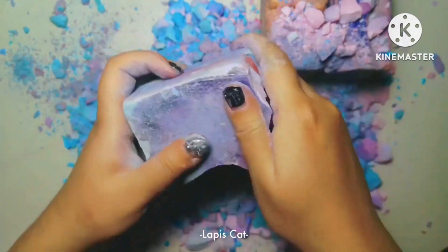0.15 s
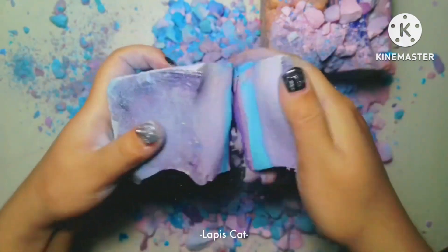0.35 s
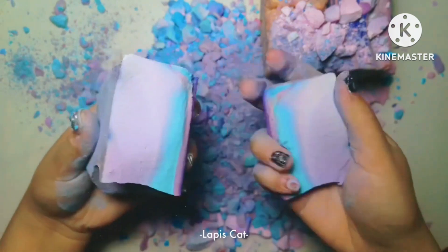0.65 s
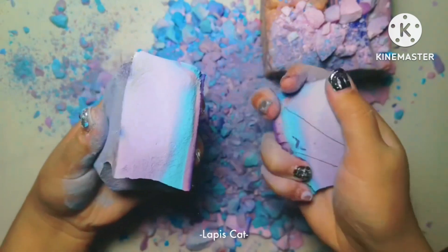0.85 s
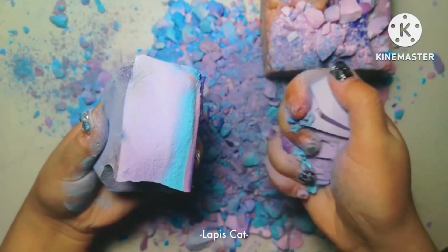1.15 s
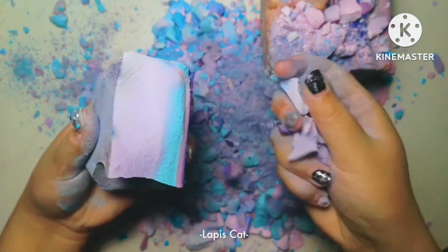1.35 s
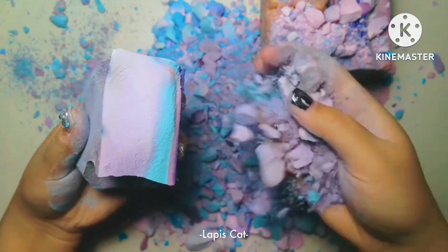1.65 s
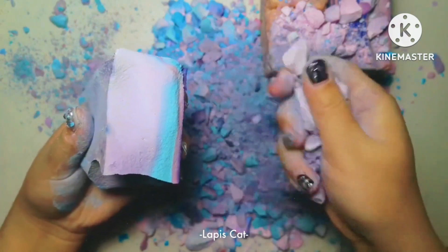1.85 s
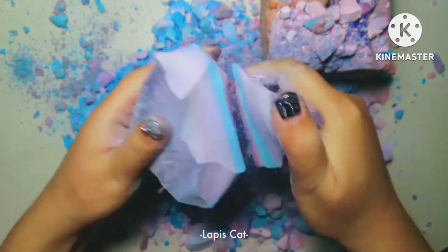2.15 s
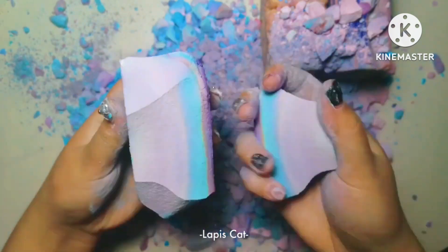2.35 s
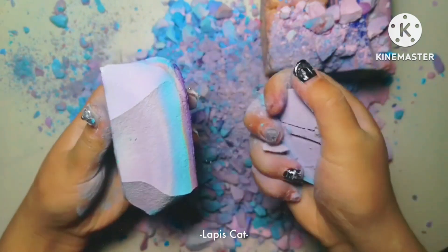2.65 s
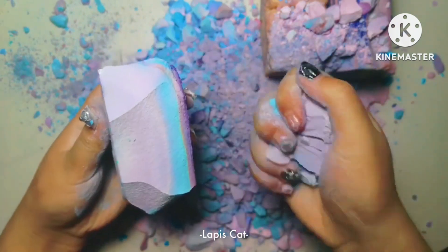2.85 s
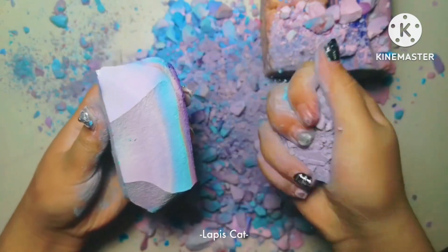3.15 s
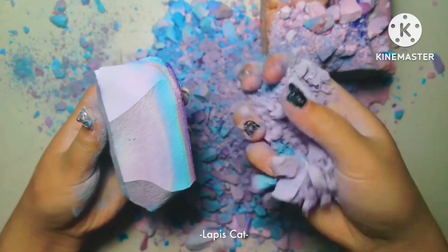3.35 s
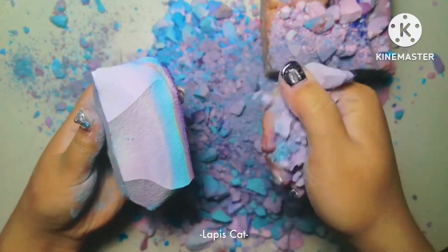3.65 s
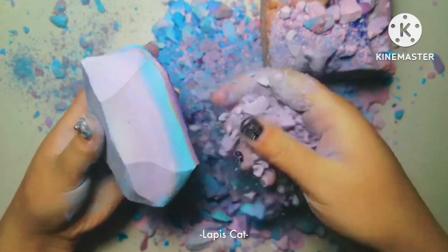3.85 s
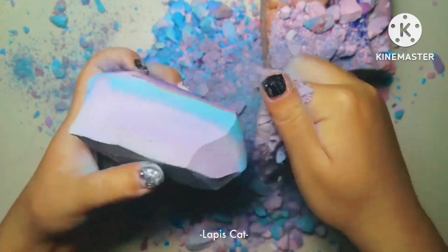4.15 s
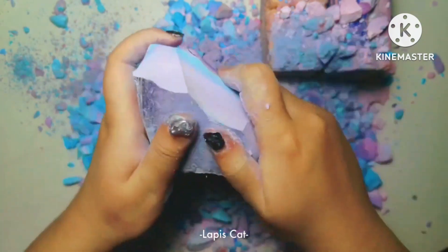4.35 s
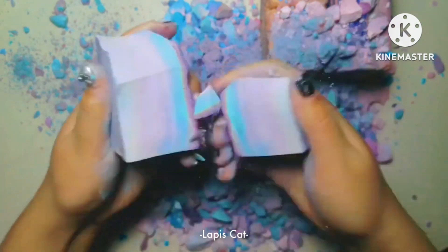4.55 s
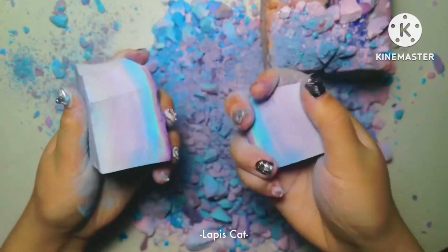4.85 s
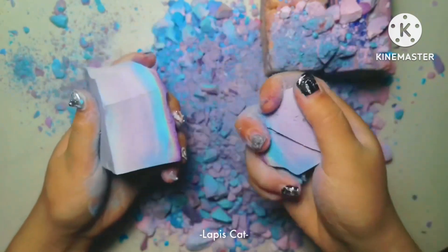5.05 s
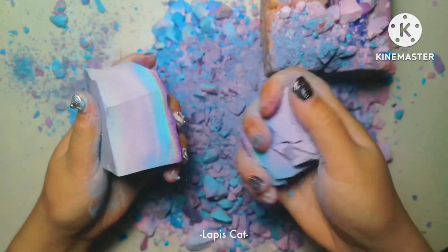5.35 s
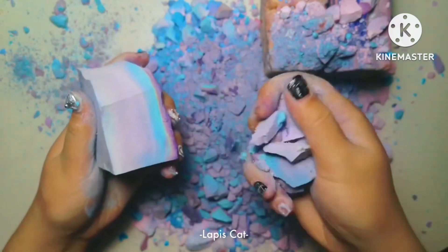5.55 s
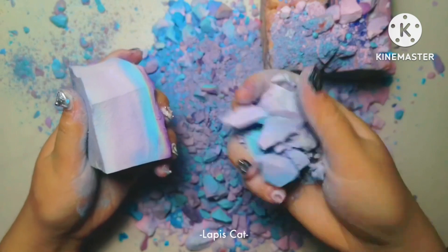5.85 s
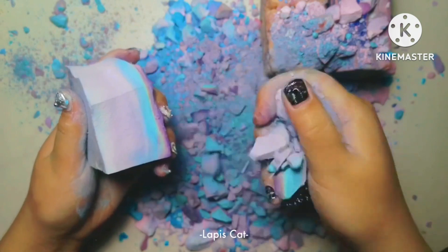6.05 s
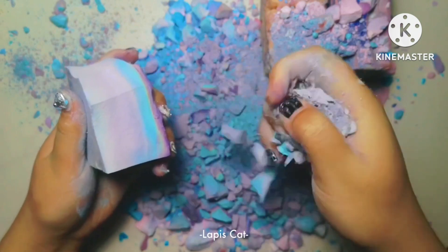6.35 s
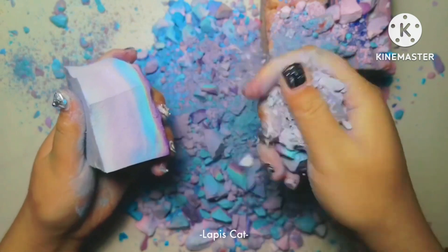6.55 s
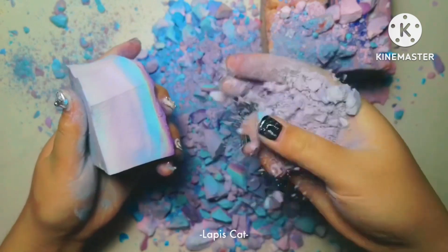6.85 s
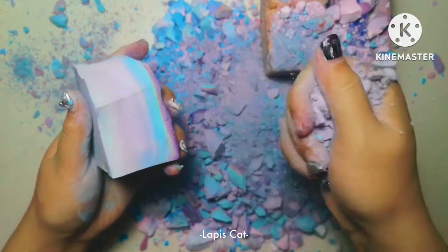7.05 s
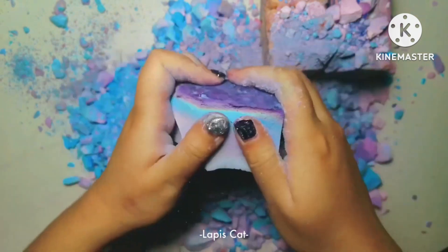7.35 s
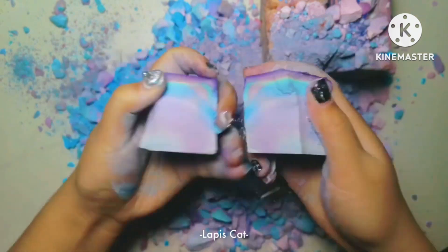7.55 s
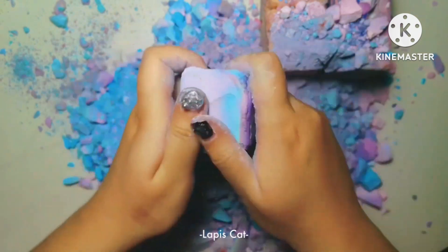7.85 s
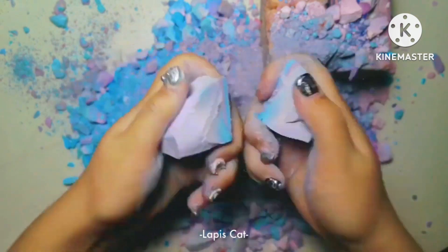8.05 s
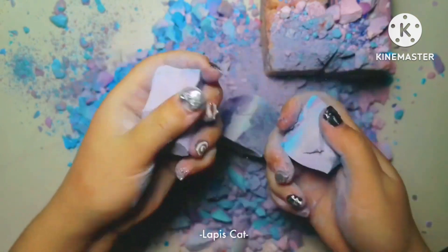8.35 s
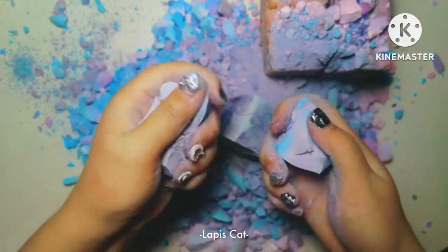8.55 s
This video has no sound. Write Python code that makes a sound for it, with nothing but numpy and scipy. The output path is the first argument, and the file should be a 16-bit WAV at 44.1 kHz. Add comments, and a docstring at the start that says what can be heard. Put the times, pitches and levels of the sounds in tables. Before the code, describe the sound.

Hands snap and crush soft chalk up close, with sharp cracks, dense crumbling, powdery hiss and low thumps in a quiet room.

```python
"""A quiet room, where two hands snap and crush blocks of soft chalk right at a pair of microphones.
Cracks are short bursts of noise with a brief ring, over a bed of crumbling grains. Powder hisses
under the skin, sliding chalk faces squeak, and loose pieces knock together. The grip and the breaks
shake the microphones, and the biggest jolts overload the recorder."""
import sys
import numpy as np
from scipy import signal
from scipy.fft import rfft, irfft, next_fast_len
from scipy.io import wavfile

SR = 44100
rng = np.random.default_rng(int(sys.argv[2]) if len(sys.argv) > 2 else 0)


def to_wav(sig):
    """Store sig (one row per channel, or 1-D mono) as 16-bit WAV at the path in sys.argv[1].

    Samples outside -1..1 are clipped; the rate is SR.
    """
    pcm = np.clip(np.atleast_2d(sig), -1, 1) * 32767
    pcm = np.round(pcm).astype(np.int16)
    wavfile.write(sys.argv[1], SR, pcm.T)  # frames by channels


N = 383229


def from_db(db):
    return 10 ** (np.asarray(db) / 20)


def at_hz(points, hz):
    points_hz, values = np.transpose(points)
    return np.interp(np.log(hz), np.log(points_hz), values)


def pan_gains(pan_db):
    """Left and right gains; positive leans left."""
    return from_db([[pan_db / 2], [-pan_db / 2]])


def add_at(track, start_s, sound):
    start = int(start_s * SR)
    track[..., start:start + sound.shape[-1]] += sound[..., :N - start]


def damped_sine(hz, level_db, t60_s):
    t = np.arange(int(t60_s * SR)) / SR
    return from_db(level_db - 60 * t / t60_s) * np.sin(2 * np.pi * hz * t)


def drift(rate_hz):
    """A slow random wander of spread 1: low-passed noise, drawn at every 40th sample."""
    pole = np.exp(-2 * np.pi * rate_hz * 40 / SR)
    slow = signal.lfilter([1], [1, -2 * pole, pole * pole], rng.standard_normal(N // 40 + 2002))[2000:]
    slow /= np.sqrt(np.mean(slow ** 2))
    return np.interp(np.arange(N) / 40, np.arange(len(slow)), slow)


def gestures(rows, rise_db_per_s, fall_db_per_s, rest_db):
    """A fader ride in dB: each move swells in, holds and ebbs to rest; the loudest wins."""
    t, level_db = np.arange(N) / SR, np.full(N, float(rest_db))
    for start_s, hold_s, hold_db in rows:
        edge_db = np.maximum(rise_db_per_s * (start_s - t), fall_db_per_s * (t - start_s - hold_s))
        level_db = np.maximum(level_db, hold_db - np.maximum(edge_db, 0))
    return level_db


# Stereo image, how alike the two microphones sound: frequency_hz, likeness (0 wide, 1 mono)
STEREO_LIKENESS = [(60, 0.15), (150, 0.42), (380, 0.4), (950, 0.82), (2380, 0.97), (5980, 0.76),
                   (15000, 0.49)]
def noise(colour, centres_hz=None):
    """Coloured stereo noise of rms 1, whole or split into bands around log-spaced centres."""
    size = next_fast_len(N)
    hz = np.arange(1, size // 2 + 2) * SR / size
    mid, side = rfft(rng.standard_normal((2, size)))
    alike = np.clip(at_hz(STEREO_LIKENESS, hz), 0, 1)
    pair = np.sqrt(1 + alike) * mid + np.sqrt(1 - alike) * side * [[1], [-1]]
    pair *= from_db(at_hz(colour, hz))
    pair *= np.sqrt(size / np.mean(abs(pair) ** 2))
    if centres_hz is None:
        return irfft(pair, size)[:, :N]
    shares = [np.interp(np.log(hz), np.log(centres_hz), band) for band in np.eye(len(centres_hz))]
    return np.array([irfft(pair * share, size)[:, :N] for share in shares])


# Fader ride of the handling noise: time_s, sway_db, rumble_db
GRIP_LEVELS = [(0.0, -13.5, -22), (0.26, -25, -24.5), (0.51, -4.5, -17.5), (0.67, -27, -25),
               (0.77, -16, -27), (2.13, -20, -20), (2.44, -2, -26), (2.52, -14.5, -21.5), (4.31, -22, -27),
               (4.69, -9, -17), (4.89, -18.5, -26.5), (6.32, -12, -20.5), (6.73, -21, -26.5),
               (7.48, -16.5, -22.5), (7.65, -11, -34), (7.74, -17, -15), (8.25, -11, -27), (8.69, -26, -19)]
# Tone of the slow sway: frequency_hz, relative_db
SWAY_COLOUR = [(1, 10.5), (3, 23), (15, 16.5), (30, 16), (50, 11.5), (100, -47.5)]
# Tone of the quick rumble: frequency_hz, relative_db
RUMBLE_COLOUR = [(25, -5.5), (50, 0), (100, -5), (200, -19), (400, -25.5), (1000, -34.5), (3000, -41)]
def grip(crumble_db):
    """The grip shakes the microphones: a deep sway, and a lumpy rumble that lifts with each squeeze."""
    times_s, *faders_db = np.transpose(GRIP_LEVELS)
    sway_db, rumble_db = [np.interp(np.arange(N) / SR, times_s, fader) for fader in faders_db]
    rumble_db += 0.12 * (crumble_db - crumble_db.mean())
    sway = from_db(sway_db) * noise(SWAY_COLOUR)
    rumble = from_db(rumble_db + 5.1 * drift(rate_hz=31)) * noise(RUMBLE_COLOUR)
    return sway + rumble


# Low thumps on the microphones: start_s, level_db, pitch_hz
JOLTS = [(0.174, 0.5, 131), (.486, 5, 118), (.715, -7.5, 90.5), (0.811, -1.5, 59.7), (.512, 15.5, 72),
         (.968, -1.5, 176), (1.037, 3.5, 274), (1.264, -4.5, 357), (1.444, -2.5, 135), (1.53, -4, 162),
         (2.363, 15.5, 122), (2.389, 5, 98), (2.639, 3, 133), (2.69, 4.5, 220), (2.754, -1.5, 182),
         (2.831, -4.5, 107), (3.527, -4, 117), (3.856, -2.5, 105), (4.625, 15, 100), (4.927, -3, 96),
         (5.205, 1.5, 136), (5.32, -2, 156), (5.582, -1.5, 126), (5.601, 2.5, 113), (5.873, -5.5, 280),
         (5.898, 1, 177), (6.104, -1.5, 152), (7.045, -1, 128), (7.544, 7, 99), (7.584, 9.5, 106),
         (7.624, 3.5, 94), (7.918, 2, 100), (8.003, 1, 68), (8.161, 4.5, 122.5), (8.432, -3.5, 104),
         (8.6, 15, 218), (8.615, -2, 100)]
def jolts(decay_cycles=5.17):
    """Each jolt reaches the microphones as a damped swing, tuned a little differently on each side."""
    out = np.zeros((2, N))
    for start_s, level_db, pitch_hz in JOLTS:
        polarity = np.sign(rng.standard_normal())
        for channel, detune in zip(out, rng.normal(1, 0.16, 2)):
            thump = damped_sine(pitch_hz * detune, level_db, decay_cycles / pitch_hz)
            add_at(channel, start_s, polarity * thump)
    return out


# Strokes of skin or chalk across powder: start_s, hold_s, level_db
RUBS = [(.2, 0.14, -27), (.555, 0.01, -18), (.61, 0.031, -15.5), (.74, 0.019, -26), (.81, 0.012, -19.5),
        (1.1, 0.09, -23), (2.0, 0.24, -25), (2.49, .05, -21), (2.58, 0.06, -24), (3.08, 0.083, -21.5),
        (3.82, 0.045, -21), (4.08, 0.067, -17.5), (4.3, 0.097, -21), (4.715, 0.069, -22),
        (4.82, 0.037, -29), (4.915, 0.048, -27), (5.59, 0.043, -17), (6.57, 0.033, -19),
        (6.96, 0.027, -20.5), (7.046, 0.0092, -30), (7.755, 0.028, -16.5), (7.815, 0.052, -21.5),
        (7.905, 0.016, -19.5), (7.965, 0.0096, -22.5), (8.04, .08, -45), (8.28, 0.074, -29.5),
        (8.415, .035, -22.5), (8.48, 0.043, -23)]
# Tone of the powder hiss: frequency_hz, relative_db
POWDER_COLOUR = [(3000, -12.5), (7000, -3.5), (8800, -10), (10800, 1), (13000, -0.5), (14800, -0.5),
                 (15600, 0.5)]
def rubbing(crumble_db):
    """Powder hisses between skin and chalk in wandering patches of treble."""
    rub_db = gestures(RUBS, rise_db_per_s=616, fall_db_per_s=700, rest_db=-43)
    powder_db = np.maximum(rub_db, crumble_db - 1.5)   # every squeeze brings hiss too
    centres_hz = np.geomspace(8000, 15000, 6)
    patches = np.array([from_db(powder_db + 3 * drift(rate_hz=25)) for _ in centres_hz])
    return np.sum(patches[:, None] * noise(POWDER_COLOUR, centres_hz), axis=0)


# Thin, high squeaks: start_s, length_s, pitch_hz, level_db, phase_jitter_rad
SQUEAKS = [(4.74, 0.016, 11060, -18, .25), (4.773, 0.023, 11400, -11.5, 0.45),
           (4.804, 0.083, 10900, -20.5, 0.21), (4.843, 0.042, 6600, -37, .07),
           (7.817, 0.016, 7117, -13.5, .03), (8.256, 0.012, 8260, -14, 0.14),
           (2.505, 0.037, 5310, -21, 0.14)]
def squeaks():
    """Two chalk faces slide and sing; the unsteady slip roughens the tone."""
    out = np.zeros(N)
    for start_s, length_s, pitch_hz, level_db, phase_jitter_rad in SQUEAKS:
        t = np.arange(int(length_s * SR)) / SR
        wobble = phase_jitter_rad * np.cumsum(rng.standard_normal(4000))[:len(t)]
        swell = from_db(level_db) * np.sin(np.pi * t / length_s)
        add_at(out, start_s, swell * np.sin(2 * np.pi * pitch_hz * t + wobble))
    return out


# Pieces of chalk knocking together: start_s, level_db
KNOCKS = [(.004, -26), (0.2527, -20.5), (.446, -13.5), (1.036, -21), (2.365, -12), (2.689, -23.5),
          (4.6188, -19), (5.203, -17), (5.873, -22), (6.255, -25), (6.291, -13), (7.582, -9),
          (8.159, -12.5), (8.599, -22)]
# The dry ring of a block: pitch_hz, gain_db, t60_s
BLOCK_MODES = [(447, 7.5, 0.025), (617, 13.5, 0.015), (900, 14.5, 0.013), (1103, 10, 0.017),
               (1910, -4, 0.041)]
def knocks(spread_db=1.9):
    """Every knock strikes the modes of the block, each with a strength of its own."""
    out = np.zeros(N)
    for start_s, level_db in KNOCKS:
        for pitch_hz, gain_db, t60_s in BLOCK_MODES:
            strike_db = rng.normal(level_db + gain_db, spread_db)
            add_at(out, start_s, damped_sine(pitch_hz, strike_db, t60_s))
    return out


# Whole blocks snapping, the weight under the big breaks: start_s, throw_db, sway_hz, rattle_db, t60_s
SNAPS = [(.446, 9, 14.2, 6, 0.4), (2.364, 7.5, 12, 6, 0.35), (4.619, 10, 10.3, 7, 0.43),
         (7.545, 6, 85, 3, 0.086), (7.583, 9.5, 14.5, 6.5, 0.28), (8.161, 8, 7.9, -1, 0.38),
         (8.601, 2.5, 51, 0, 0.15)]
# Tone of the rattle: frequency_hz, relative_db
RATTLE_COLOUR = [(30, -4.5), (70, 13), (160, -4.5), (400, -12.5), (1200, -29.5), (3000, -39.5)]
def snaps(recoil_s=0.0016):
    """A block gives way and throws the microphones: a quick recoil, then a dying sway and rattle."""
    out, rattle_noise = np.zeros((2, N)), noise(RATTLE_COLOUR)
    for start_s, throw_db, sway_hz, rattle_db, t60_s in SNAPS:
        start = int(start_s * SR)
        t = np.arange(min(int(t60_s * SR), N - start)) / SR
        recoil = 1 - np.exp(-t / recoil_s)
        detune = rng.normal(1, 0.14, (2, 1))
        sway = from_db(throw_db) * np.sin(np.pi * recoil + 2 * np.pi * sway_hz * detune * t)
        rattle = recoil * from_db(rattle_db - 45 * t / t60_s) * rattle_noise[:, start:start + len(t)]
        add_at(out, start_s, (rattle - sway) * from_db(-60 * t / t60_s))
    return out


# Squeezes of the fist, each a crunch of its own: start_s, hold_s, level_db
SQUEEZES = [(0, .04, -26), (.07, 0.24, -27.5), (.452, 0.0096, -19.5), (.58, 0.1, -35.5),
            (.81, 0.014, -33.5), (.978, 0.016, -33), (1.045, 0.016, -21.5), (1.11, 0.18, -32),
            (1.255, 0.046, -16.5), (1.405, 0.038, -14.5), (1.47, 0.25, -25.5), (1.79, 0.036, -24),
            (1.86, 0.16, -25.5), (2.05, 0.18, -25), (2.378, 0.0065, -25), (2.46, 0.11, -36),
            (2.7, 0.03, -31), (2.765, 0.017, -33), (2.82, 0.0094, -22), (2.88, 0.1, -24),
            (3.07, 0.14, -23.5), (3.24, 0.16, -25), (3.47, 0.068, -24), (3.61, 0.18, -24.5),
            (3.81, 0.08, -26), (3.9, 0.17, -32), (4.075, 0.18, -24), (4.28, 0.082, -28.5),
            (4.435, 0.026, -24.5), (4.71, 0.054, -31), (4.82, 0.13, -46.5), (5.215, 0.028, -26.5),
            (5.325, 0.095, -26.5), (5.51, .06, -30.5), (5.58, 0.033, -20), (5.65, .19, -26.5),
            (5.85, 0.051, -22), (6.0, 0.12, -30), (6.13, 0.015, -23), (6.19, 0.13, -29), (6.34, 0.17, -24),
            (6.47, 0.05, -18), (6.565, 0.036, -17.5), (6.655, .09, -22), (6.77, 0.11, -24.5),
            (6.93, 0.062, -25.5), (7.07, 0.18, -24), (7.345, 0.06, -24.5), (7.535, 0.074, -31.5),
            (7.75, 0.036, -37), (7.815, 0.021, -30.5), (7.9, 0.023, -42), (8.09, 0.043, -42),
            (8.173, .015, -25), (8.27, 0.076, -39), (8.42, 0.11, -42), (8.585, 0.079, -30.5)]
def squeezing():
    """The level of the crumbling in dB, rising and falling as the fist works the chalk."""
    return gestures(SQUEEZES, rise_db_per_s=694, fall_db_per_s=494, rest_db=-49)


def grains(crumble_db, grains_per_s=130, lift_db=10.5, spread_db=4.5, width_octaves=1.19):
    """Grains break at random, louder under a squeeze: one burst for crunch() to play per grain."""
    gap, size, pitch, length, side = rng.random((4000, 5)).T
    starts_s = np.cumsum(-np.log(gap) / grains_per_s)
    accents_db = lift_db + spread_db * np.minimum(-np.log(size), 4)
    rows = zip(starts_s, accents_db, 1500 * 7 ** pitch, 0.0013 + 0.0052 * length, 8 * (side - .5))
    return [(start_s, crumble_db[int(start_s * SR)] + accent_db, pitch_hz, t60_s, pan_db, width_octaves)
            for start_s, accent_db, pitch_hz, t60_s, pan_db in rows if start_s < N / SR]


# Tone of fracturing chalk: frequency_hz, relative_db
CRUNCH_COLOUR = [(290, 7.5), (500, 1.5), (1470, -3), (1990, -5.5), (3630, -2.5), (6830, -5), (8480, -10),
                 (13000, 0), (15500, -5.5)]
def crunch(bursts, crumble_db, dust_db=-22):
    """Over a flickering bed of tiny fractures, bursts of noise die fast and trail off as dust."""
    centres_hz = np.geomspace(500, 13000, 8)
    gates = np.zeros((8, 2, N))
    for start_s, level_db, pitch_hz, t60_s, pan_db, width_octaves in bursts:
        fall_db = 60 * np.arange(int(2 * t60_s * SR)) / (t60_s * SR)
        decay = from_db(level_db - fall_db) + from_db(level_db + dust_db - fall_db / 5)
        band_share = np.exp(-.5 * (np.log2(centres_hz / pitch_hz) / width_octaves) ** 2)
        add_at(gates, start_s, band_share[:, None, None] * pan_gains(pan_db) * decay)
    bed_db = crumble_db + 2.5 * drift(rate_hz=46)
    bed = np.array([from_db(bed_db + 3.26 * drift(rate_hz=19)) for _ in centres_hz])
    bed[-1] = 0   # the bed is dull: its top band stays shut
    return np.sum((gates + bed[:, None]) * noise(CRUNCH_COLOUR, centres_hz), axis=0)


# The loud cracks, up front: start_s, level_db, pitch_hz, burst_t60_s
CRACKS = [(.215, -10, 11700, .003), (0.2528, -2, 1520, 0.0071), (0.2564, -6, 5100, 0.0084),
          (0.3086, -1, 10100, 0.0021), (0.3611, -10.5, 4000, 0.0062), (0.4462, 10, 3630, 0.0061),
          (.4613, -13, 5000, 0.01), (0.7124, -10, 8800, 0.015), (0.965, -6.5, 5800, 0.035),
          (1.0166, -2, 7800, 0.0048), (1.0356, -5, 2600, 0.013), (1.1032, -1, 5500, 0.003),
          (1.12, -6, 9000, 0.0034), (1.1759, -1, 3300, 0.0079), (1.1884, 4, 5840, 0.0017),
          (1.2237, 2, 5430, 0.0068), (1.2389, -1, 3700, 0.0019), (1.2528, -6, 4800, 0.011),
          (1.3707, -4, 3900, 0.0048), (1.5096, -11, 5100, 0.0035), (1.586, -4, 4570, 0.0022),
          (1.6974, -3.5, 6040, 0.0081), (1.7792, -10, 6800, 0.0068), (2.0956, -10, 7400, 0.0038),
          (2.132, 2, 4480, 0.0044), (2.362, 4, 4140, 0.014), (2.64, 2.5, 7270, 0.0075),
          (2.654, -5.5, 4300, 0.0078), (2.6884, -4, 4120, .01), (2.7522, -2, 3800, .0092),
          (2.8311, -5, 4470, 0.016), (2.8594, 0, 3500, 0.0066), (2.887, -3, 2600, 0.027),
          (2.9428, -2, 4430, 0.015), (3.0985, -10.5, 4730, .014), (3.1351, -5, 6070, .0039),
          (3.1636, -8, 7600, 0.0083), (3.2091, -6.5, 7600, 0.0071), (3.332, -6, 5060, 0.008),
          (3.3793, -11, 6300, 0.0029), (3.413, -8, 3930, .003), (3.6764, -4, 7100, 0.0023),
          (3.682, -1, 2100, 0.0076), (3.759, -3, 3200, 0.012), (3.83, -9, 3600, 0.0042),
          (3.8377, -3, 9600, 0.004), (3.8999, -12, 6440, .0024), (4.1486, 3, 1490, 0.005),
          (4.1575, -5, 3730, 0.0037), (4.202, -8, 6030, 0.0033), (4.3813, -7.5, 6950, 0.0063),
          (4.394, -11, 7800, .0049), (4.446, -15, 3430, 0.0053), (4.5538, -18.5, 3430, 0.003),
          (4.599, -21, 8700, .0051), (4.6176, -3.5, 2860, 0.0085), (4.907, -19, 11500, .011),
          (4.9239, -3, 10660, 0.0036), (4.947, -19, 9000, .0047), (5.0103, -14.5, 9600, .0027),
          (5.049, -10.5, 8800, 0.0087), (5.174, -10.5, 2530, 0.0063), (5.2027, 4, 3840, 0.015),
          (5.218, -6.5, 5000, 0.014), (5.3068, -6.5, 3740, 0.018), (5.3178, -9, 4600, .041),
          (5.383, -4.5, 4470, 0.0056), (5.5168, -3, 6500, 0.0047), (5.5478, -9, 10400, 0.0037),
          (5.668, -10.5, 6950, 0.019), (5.6951, -5.5, 7460, .0094), (5.7244, -7, 6100, .006),
          (5.8, -5, 4670, .0028), (5.8726, -4, 3370, 0.0087), (5.8965, -9, 2640, .024),
          (6.2542, -10, 2200, .0053), (6.2903, -5, 2630, 0.013), (6.3304, -7, 6600, 0.0016),
          (6.359, -3, 4960, 0.0018), (6.3777, -10, 4670, 0.0041), (6.428, 2, 3200, 0.0036),
          (6.436, -3, 3800, 0.0033), (6.4442, -2, 3380, .0022), (6.4702, -10, 4000, 0.0027),
          (6.4975, -8, 3280, .008), (6.519, -8, 4200, 0.0028), (6.5267, -8, 4600, .005),
          (6.5491, -7, 6600, 0.0049), (6.566, -4, 4200, .005), (6.7065, -8, 4830, 0.0048),
          (6.8103, -6.5, 6500, 0.003), (6.843, -5, 6700, .005), (6.8858, -10, 5100, 0.0043),
          (6.979, -7, 10300, 0.003), (7.0408, -7, 8300, 0.0089), (7.145, -4, 4400, 0.006),
          (7.172, -4, 4900, 0.0046), (7.2036, -6, 9300, 0.014), (7.2768, -7, 6400, 0.0026),
          (7.349, -11, 5800, 0.003), (7.3714, -9, 6400, .0049), (7.392, 0, 3580, 0.0011),
          (7.507, -15, 10800, .0067), (7.537, -4.5, 6900, 0.0092), (7.5423, -1, 5600, 0.01),
          (7.5819, 4.5, 2920, 0.0072), (8.12, -25, 6000, .0055), (8.128, 4, 9600, 0.002),
          (8.1584, 13, 2600, 0.008), (8.217, -15, 8000, .0034), (8.2587, -9.5, 9000, .0065),
          (8.266, -15, 6040, 0.0049), (8.271, -3.5, 2320, 0.0058), (8.5716, -8.5, 6800, 0.017),
          (8.5803, -0.5, 6240, 0.0057), (8.6004, -7, 2920, 0.039), (8.645, 0.5, 9700, 0.0037)]
def breaking_chalk(crumble_db, burst_db=3.5, width_octaves=1.93, ring_db=-2, ring_cycles=9):
    """Cracks cut through the crumbling grains: each a wide burst, as the freed fragment rings briefly."""
    bursts = grains(crumble_db)
    for start_s, level_db, pitch_hz, burst_t60_s in CRACKS:
        pan_db = rng.normal(-2.0, 3.3)
        bursts.append((start_s, level_db + burst_db, pitch_hz, burst_t60_s, pan_db, width_octaves))
    out = crunch(bursts, crumble_db)
    for (start_s, level_db, pitch_hz, _), polarity in zip(CRACKS, rng.choice([-1, 1], len(CRACKS))):
        ring = damped_sine(pitch_hz, level_db + ring_db, ring_cycles / pitch_hz)
        add_at(out, start_s, polarity * ring)
    return out


def scene():
    """The mix: the same squeezes drive the crunch, the powder hiss and a little of the rumble."""
    crumble_db = squeezing()
    handling = (grip(crumble_db) + jolts()) * pan_gains(1.65)   # the left microphone is held harder
    return handling + breaking_chalk(crumble_db) + knocks() + rubbing(crumble_db) + squeaks() + snaps()


def record(dry, microphone_top_hz=15900, ceiling=0.93, knee=5.0, cutoff_hz=16600):
    """The recorder overloads: big swings flatten at the ceiling and mute the treble riding on them."""
    heard = signal.sosfilt(signal.cheby2(12, 20, microphone_top_hz, fs=SR, output="sos"), dry)
    flattened = heard / (1 + abs(heard / ceiling) ** knee) ** (1 / knee)
    return signal.sosfilt(signal.cheby2(12, 70, cutoff_hz, fs=SR, output="sos"), flattened)


dry = scene()
out = record(dry)
to_wav(out)
```